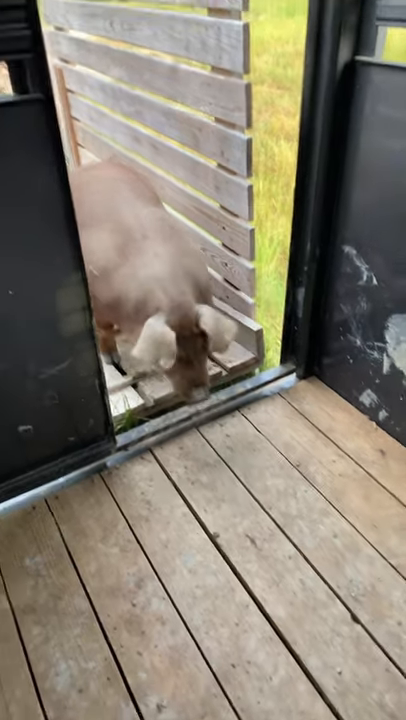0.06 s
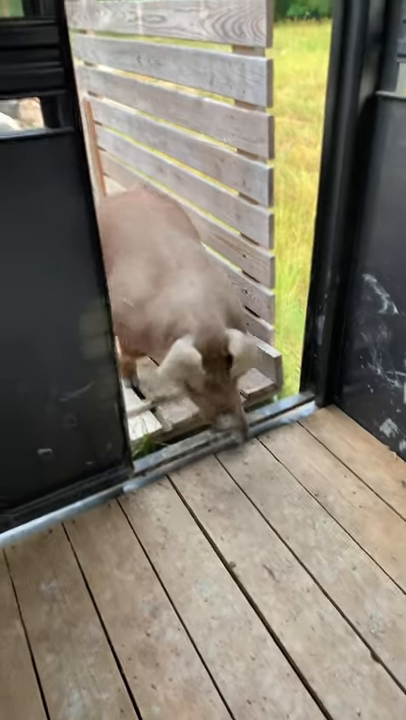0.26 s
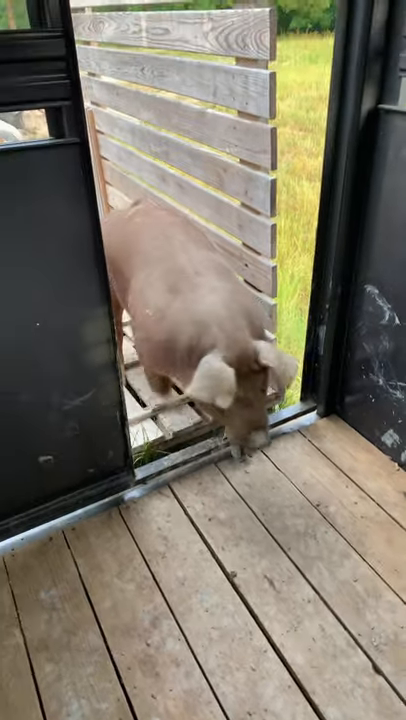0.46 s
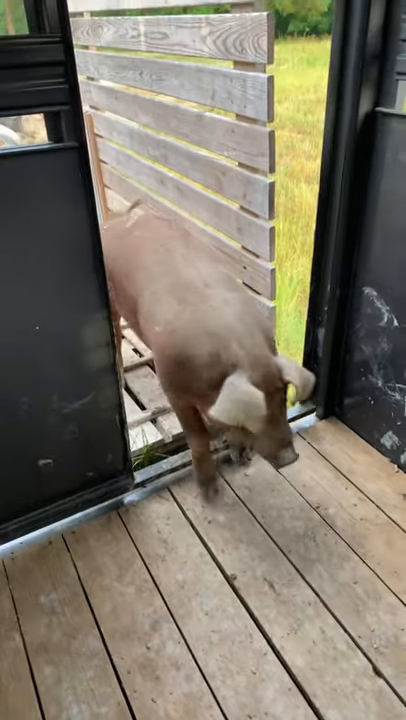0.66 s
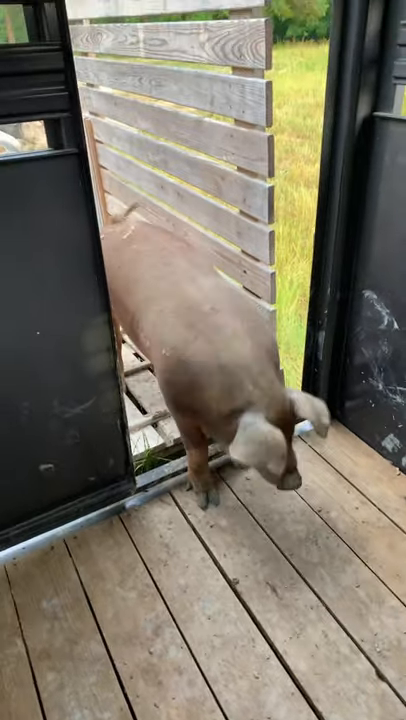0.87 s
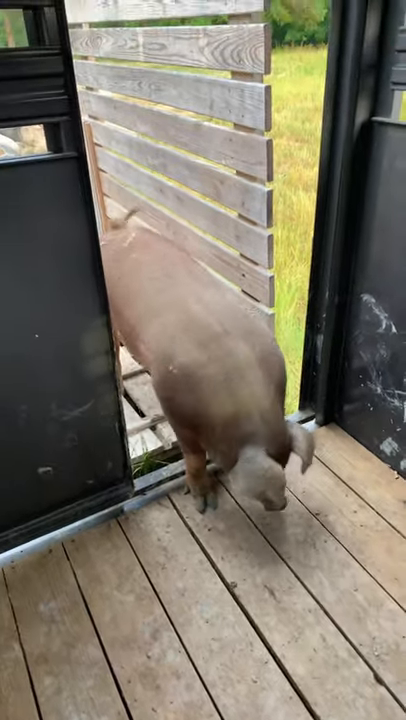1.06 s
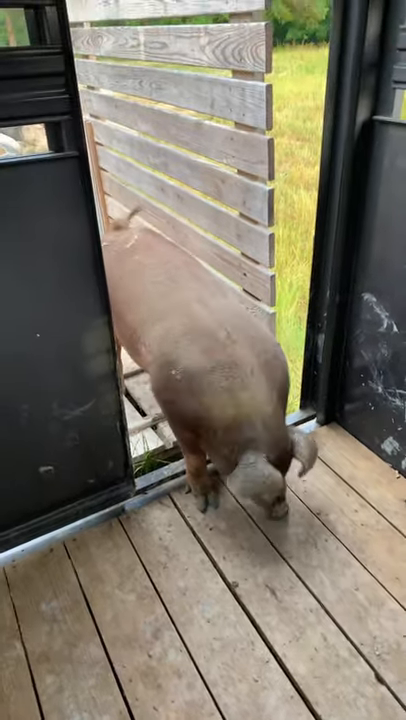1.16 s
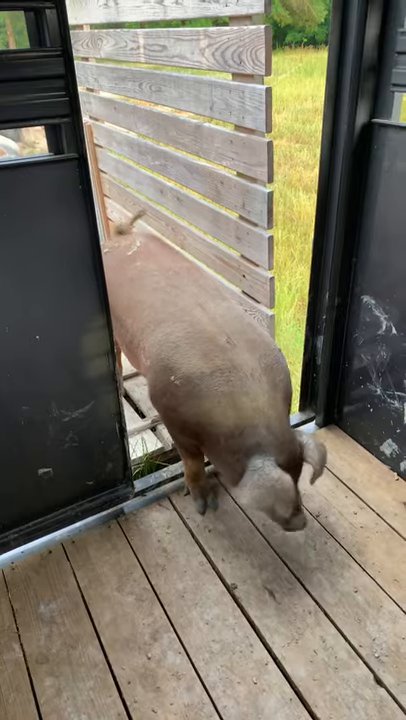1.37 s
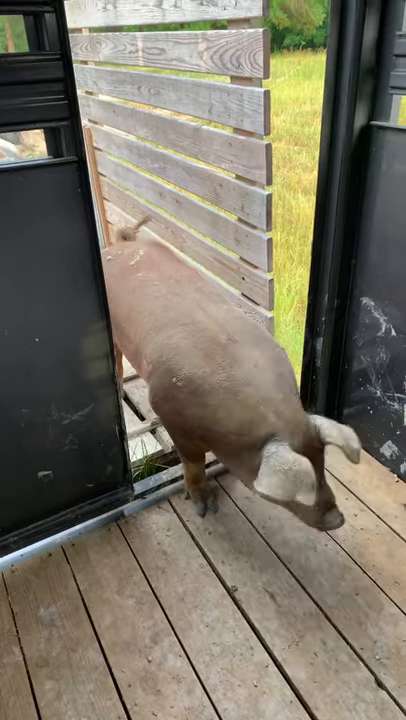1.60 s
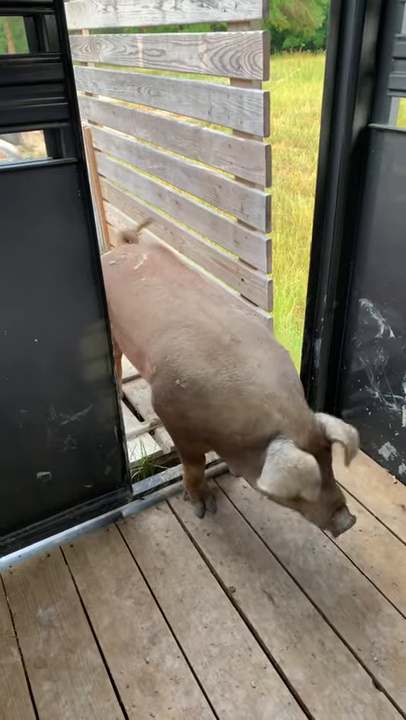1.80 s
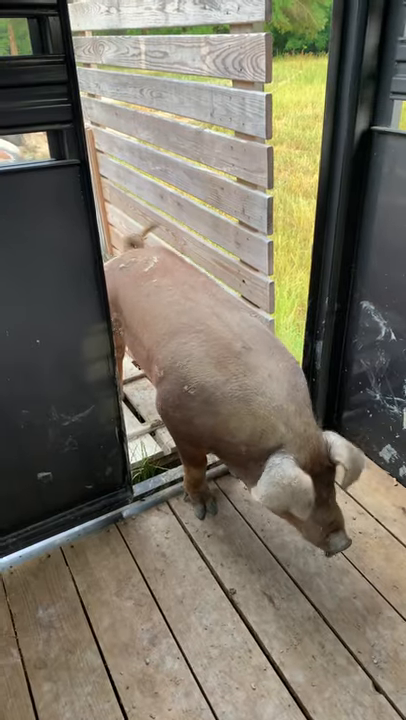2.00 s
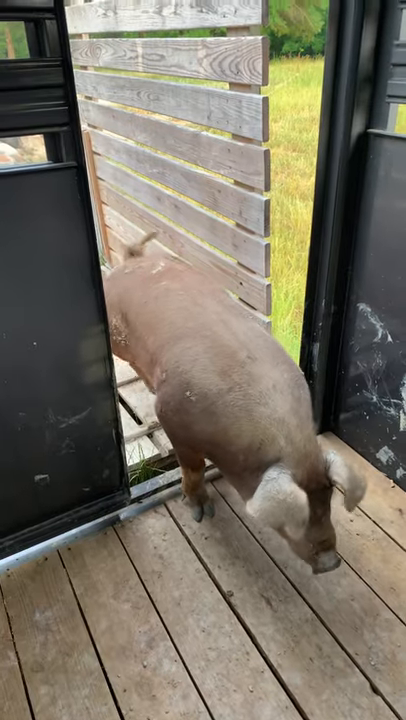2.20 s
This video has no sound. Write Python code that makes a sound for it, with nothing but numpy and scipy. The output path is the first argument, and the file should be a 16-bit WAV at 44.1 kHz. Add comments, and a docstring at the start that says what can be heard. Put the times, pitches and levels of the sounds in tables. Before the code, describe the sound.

A pig steps onto wooden boards with clattering hoof thumps, grunts briefly, then shuffles more softly

```python
"""A pig steps from a slatted ramp into a plank-floored trailer, close to a phone.
Hooves knock at once: noise cracks, ringing boards and the floor's boom. One short rattling grunt follows,
throat pulses ringing fixed resonances, then a swell of hiss, more knocks and two late hisses.
Hiss, from hoof and snout, is shaped noise. Behind it all lie a swelling low rumble of filtered noise
and an outdoor noise hush that throbs thirty times a second, with a short motor-like putt in each throb."""
import sys
import numpy as np
from scipy import signal
from scipy.fft import rfft, irfft
from scipy.io import wavfile
from scipy.ndimage import uniform_filter1d

SR = 44100
rng = np.random.default_rng(int(sys.argv[2]) if len(sys.argv) > 2 else 0)


def digitize_waveform(pressure):
    """Quantize a signal to 16-bit integers and store it at the path in sys.argv[1].

    Rows of a 2-D input are taken as channels; values are limited to [-1, 1].
    """
    field = np.atleast_2d(pressure).T
    bounded = np.clip(field, -1, 1)
    quanta = np.round(bounded * 32767).astype(np.int16)
    wavfile.write(sys.argv[1], SR, quanta)


def amplitude_ratio(level_db):
    """Convert a level in decibels to the matching linear amplitude (field) ratio."""
    exponent = np.asarray(level_db, float) / 20
    return 10 ** exponent


N = 99225  # length in samples
THROB_PER_S = 30.0  # shared by the hush and the putts


def evened(x):
    """Scales to rms 1."""
    return x / np.sqrt(np.mean(x ** 2) + 1e-20)


def read(points, hz):
    """Reads a table on a log-frequency axis."""
    f, value = np.transpose(points)
    return np.interp(np.log(hz + 1), np.log(f + 1), value)


def add(mix, s, sound):
    """Mixes a sound in at time s."""
    part = mix[max(round(s * SR), 0):][:len(sound)]
    part += sound[:len(part)]


def noise(spectrum, size, tilt_db=0, patchy_db=0):
    """Short-time spectra of coloured noise, tilted in dB per octave, with drifting patches."""
    hz = np.fft.rfftfreq(512, 1 / SR)
    real, imag, patches = rng.standard_normal((size // 128 + 5, 257, 3)).T
    patches = uniform_filter1d(patches, 8, 0)  # across frequency
    patches = evened(uniform_filter1d(patches, 20, 1))  # along time
    db = read(spectrum, hz) + tilt_db * np.log2((hz + 1) / 1000)
    return hz, (real + 1j * imag) * amplitude_ratio(db[:, None] + patchy_db * patches)


def sound_of(z, size):
    """Back from short-time spectra to a waveform."""
    return signal.istft(z, nperseg=512, noverlap=384)[1][:size]


def burst(spectrum, rise_s, tilt_db=0):
    """Diffuse noise burst with a raised front, each band dying at its own rate."""
    # decay time over frequency: pitch_hz [Hz], t60_s [s]
    decay = [(500, 0.68), (1000, 0.54), (2000, 0.45), (4000, .35), (8000, 0.39), (13000, 0.32)]
    snap_db, snap_s = 2, 0.0096  # the front stands out
    t = np.arange(SR) / SR
    hz, z = noise(spectrum, SR, tilt_db, patchy_db=3.5)
    steady_level = np.std(sound_of(z, SR))
    frame_s = np.arange(z.shape[1]) * 128 / SR
    z = z * amplitude_ratio(-60 * frame_s / read(decay, hz)[:, None])
    front = (1 - np.exp(-t / rise_s)) * amplitude_ratio(snap_db * np.exp(-t / snap_s))
    return sound_of(z, SR) / steady_level * front


def free_ring(modes, t):
    """Sines that start together and decay exponentially, each by 60 dB in its t60."""
    return sum(amplitude_ratio(db - 60 * t / t60) * np.sin(2 * np.pi * hz * t) for hz, db, t60 in modes)


def ring(modes, rise_s, drive_s):
    """Modes driven by one short rough push of noise, brought to a level near 1."""
    t = np.arange(SR) / SR
    push = rng.standard_normal(SR) * (1 - np.exp(-t / rise_s)) * np.exp(-t / drive_s)
    out = signal.fftconvolve(free_ring(modes, t), push / np.linalg.norm(push))[:SR]
    return out / np.sqrt(sum(amplitude_ratio(2 * db) for _, db, _ in modes) / 2)


def hooves():
    """Each knock cracks, rings the boards and swells into the floor's boom; soft steps lose the high modes."""
    # hoof knocks: start_s [s], crack_db [dB], boom_db [dB], hardness [dB per octave], rise_s [s]
    knocks = [(.0, -64, -78, 2, 0.0044), (.051, -42.5, -44, -5, 0.0018), (0.143, -50, -48.5, -3, .015),
              (0.227, -37, -28.5, 2.04, 0.0026), (.262, -42, -36.5, 0.5, 0.0035),
              (0.292, -52, -30, -7, 0.0077), (0.344, -48, -41.5, -5, 0.019), (0.429, -59, -34, -9, 0.0033),
              (.503, -52, -41.5, -22, 0.013), (.55, -70, -47.5, -16, 0.011), (.995, -54, -44, -5.5, 0.0089),
              (1.234, -48.5, -36, -2.5, 0.0063), (1.079, -65.5, -46.5, -4.5, 0.0062),
              (1.301, -53.5, -39, -17, 0.0087), (1.381, -65, -41.5, 2.5, 0.019),
              (1.471, -59, -44.5, 2, 0.021), (1.71, -58, -44, -4.5, 0.013), (1.79, -84, -44.5, 5, 0.006)]
    # colour of the crack before the hardness tilt: pitch_hz [Hz], relative level [dB per Hz]
    crack_colour = [(300, -39), (420, -21), (612, -11.5), (867, -0.5), (1050, -3.5), (1430, 3), (1900, -8),
                    (2250, -11.5), (2800, -5.5), (3700, -8), (4600, -13), (5800, -11.5), (6700, -21),
                    (7200, -36.5), (9000, -25.5), (11500, -40), (15000, -64)]
    # board modes before the hardness tilt: pitch_hz [Hz], relative level_db [dB], t60_s [s]
    board_modes = [(791, 10.5, 0.037), (851, -3, 0.059), (1418, 2, 0.21), (1732, 10, 0.042),
                   (2008, -15, 0.063), (2846, -1.5, 0.043), (3594, -7, 0.24), (4290, -6, 0.065),
                   (6000, -14, 0.072)]
    # trailer floor modes: pitch_hz [Hz], relative level_db [dB], t60_s [s]
    floor_modes = [(76, -26, 0.65), (112.6, -2.5, 0.17), (137, -2.5, 0.29), (177.3, 3, 0.26),
                   (213.5, 0.5, 0.13), (268.5, -7.5, 0.24), (310, -3.5, 0.14), (369.2, -11, 0.13),
                   (488, -16.5, 0.29)]
    board_db = 4  # over the crack
    boom_lag = 1.4  # boom rise over crack rise
    board_push_s, boom_push_s = 0.056, 0.058
    out = np.zeros(N)
    for s, crack_db, boom_db, hard_db, rise_s in knocks:
        tilted = [(hz, db + hard_db * np.log2(hz / 1400), t60) for hz, db, t60 in board_modes]
        crack = burst(crack_colour, rise_s, hard_db)
        boards = amplitude_ratio(board_db) * ring(tilted, rise_s, board_push_s)
        boom = ring(floor_modes, boom_lag * rise_s, boom_push_s)
        add(out, s, amplitude_ratio(crack_db) * (crack + boards) + amplitude_ratio(boom_db) * boom)
    return out


def grunt():
    """Separate throat pulses ring fixed resonances, with breathy rasp, chest and the trailer walls' echo."""
    # pulses, mostly strong and weak in turn: start_s [s], level_db [dB], chest_db [dB], rasp_db [dB]
    pulses = [(0.663, -38.5, -44.5, -53), (.673, -49, -59, -68), (.688, -23, -38, -43.5),
              (.699, -26, -39, -49), (.711, -21, -34, -40), (.723, -48.5, -38, -37.5),
              (.737, -19.5, -32.5, -44), (.749, -34, -43.5, -57), (0.764, -38.5, -41.5, -51)]
    # throat resonances: pitch_hz [Hz], relative level_db [dB], t60_s [s]
    throat_modes = [(801, -9, 0.13), (853.7, -6.5, 0.16), (1035, -7.5, 0.056), (1147, -5.5, 0.064),
                    (1272, 7.5, 0.043), (1329, -3.5, 0.074), (1480, 0, 0.038), (1605, -8.5, 0.039),
                    (1860, -19, 0.05), (2346, -28.5, 0.15), (2950, -33, 0.04), (4270, -13, 0.035),
                    (4860, -29, 0.057)]
    # chest resonances: pitch_hz [Hz], relative level_db [dB], t60_s [s]
    chest_modes = [(78, -17, .1), (120.2, 3, 0.18), (211.3, -6, 0.29), (254, 2, 0.033)]
    # colour of the breath in each pulse: pitch_hz [Hz], relative level [dB per Hz]
    rasp_colour = [(400, -13), (620, -28), (850, -9), (1290, -1), (1700, -15.5), (2100, -24.5),
                   (2750, -7.5), (3400, -15), (4700, -7), (5800, -17), (6700, -18), (7200, -31.5),
                   (12000, -39), (15000, -52)]
    pulse_rise_s, rasp_rise_s = 0.0029, 0.0035
    echo_db, echo_gap_s, echo_t60_s = -6, 0.014, 0.21
    out, t = np.zeros(N), np.arange(SR) / SR
    tone = free_ring(throat_modes, t) * (1 - np.exp(-t / pulse_rise_s)) / 1.11
    chest = free_ring(chest_modes, t)
    for s, db, chest_db, rasp_db in pulses:
        rasp = burst(rasp_colour, rasp_rise_s)
        add(out, s, amplitude_ratio(db) * tone + amplitude_ratio(rasp_db) * rasp + amplitude_ratio(chest_db) * chest)
        walls = rng.standard_normal(SR) * amplitude_ratio(-60 * t / echo_t60_s)
        echo = signal.fftconvolve(tone, walls / np.linalg.norm(walls))[:SR]
        add(out, s + echo_gap_s, amplitude_ratio(db + echo_db) * echo)
    return out


def hisses():
    """Soft swells of hiss from sliding hoof and sniffing snout: coloured noise under bell-shaped envelopes."""
    # swells: peak_s [s], width_s [s, between the 1/e points], level_db [dB]
    swells = [(.16, 0.15, -65.5), (0.298, 0.13, -67), (0.828, 0.16, -54), (1.932, 0.029, -69),
              (2.27, 0.099, -58.5)]
    # colour of the hiss: pitch_hz [Hz], relative level [dB per Hz]
    colour = [(2500, -2), (4000, -13.5), (6200, -1), (7200, -16), (8500, -11), (11500, -18), (15000, -28)]
    t = np.arange(N) / SR
    shape = sum(amplitude_ratio(db) * np.exp(-(2 * (t - s) / width) ** 2) for s, width, db in swells)
    return shape * evened(sound_of(noise(colour, N, patchy_db=2.5)[1], N))


def putts():
    """Short, nearly even putts, like a small motor some way off: a noise puff and a hollow ringing tick."""
    # colour of the puff: pitch_hz [Hz], relative level [dB per Hz]
    puff_colour = [(400, 18), (700, -27), (1100, -1), (1500, 20), (2000, -3.5), (2600, -11), (6500, -37.5),
                   (7000, -53), (12000, -39)]
    # modes of the tick before detuning: pitch_hz [Hz], relative level_db [dB], t60_s [s]
    tick_modes = [(793, -3.5, 0.09), (1240, -19, 0.037), (1543, -13.5, 0.069), (1940, -7.5, 0.033)]
    puff_db, tick_db, spread_db = -55, -61, 1.2  # the spread is from putt to putt
    early_s, rise_s, fall_s = 0.00284, 0.0011, 0.0063
    turns = THROB_PER_S * (np.arange(N) / SR + early_s)
    since_s = turns % 1 / THROB_PER_S  # time since the putt began
    index = turns.astype(int)
    size = rng.standard_normal(100)[index]
    tune = rng.uniform(0.932, 0.95, (100, 4))[index].T  # lowers each mode afresh in every putt
    tick = sum(free_ring([(hz * c, db, t60)], since_s) for (hz, db, t60), c in zip(tick_modes, tune))
    puff = np.exp(-since_s / fall_s) * evened(sound_of(noise(puff_colour, N)[1], N))
    onset = amplitude_ratio(spread_db * size) * (1 - np.exp(-since_s / rise_s))
    return onset * (amplitude_ratio(puff_db) * puff + amplitude_ratio(tick_db) * tick)


def hush():
    """Outdoor hush: coloured noise whose level pulses evenly in narrow peaks."""
    # colour of the hush: pitch_hz [Hz], relative level [dB per Hz]
    colour = [(100, -20), (135, -10), (280, -11.5), (350, -20.5), (410, -34), (560, -28), (800, -25.5),
              (1150, -22.5), (1560, -28), (2100, -35), (2770, -40.5), (4040, -35.5), (5670, -33.5),
              (6650, -34.5), (7000, -47.5), (10000, -47.5), (12500, -53.5), (15000, -70)]
    level_db, throb_db = -59.5, 3
    late_s, sharpness = 0.0013, 2.7  # a higher power narrows the peaks
    phase = 2 * np.pi * THROB_PER_S * (np.arange(N) / SR - late_s)
    beat = (0.5 + 0.5 * np.cos(phase)) ** sharpness
    air = sound_of(noise(colour, N, patchy_db=3.3)[1], N)
    return amplitude_ratio(level_db) * evened(amplitude_ratio(throb_db * beat) * air)


def rumble():
    """Lumpy low rumble of wind and the swaying trailer: low noise under a drawn swell."""
    # colour of the rumble: pitch_hz [Hz], relative level [dB per Hz]
    colour = [(15, -48), (25, -79), (36, -19.5), (65, -2.5), (119, -13), (140, -10), (180, -19),
              (310, -120)]
    # swell around the base level: time_s [s], level_db [dB]
    swell = [(0, -6.5), (.2, -5), (.33, 10), (.5, 7), (.62, -1.5), (.75, 3.5), (0.899, 2.5), (1.1, 5.5),
             (1.18, -0.5), (1.3, -1), (1.6, -1), (1.9, -1.5), (2.0, -1), (2.25, -3)]
    base_db = -49.5
    hz = np.fft.rfftfreq(N, 1 / SR)
    spectrum = rfft(rng.standard_normal(N)) * amplitude_ratio(read(colour, hz)) * (hz < 300)
    s, db = np.transpose(swell)
    return amplitude_ratio(base_db + np.interp(np.arange(N) / SR, s, db)) * evened(irfft(spectrum, N))


def scene():
    """All sources, mono."""
    return (hooves() + grunt() + hisses() + putts() + hush() + rumble())[None]


def band_limit(x):
    """A steep low-pass at the top of the band."""
    return signal.sosfilt(signal.butter(12, 15580, fs=SR, output="sos"), x)


def record(dry):
    """The phone's band limits: a steep low cut and a steeper top cut."""
    low_cut = signal.butter(4, 42.5, "high", fs=SR, output="sos")  # Hz
    top_cut = signal.butter(10, 15000, fs=SR, output="sos")  # Hz
    mix = signal.sosfilt(np.vstack([low_cut, top_cut]), dry)
    return band_limit(mix)


dry = scene()
out = record(dry)
digitize_waveform(out)
```